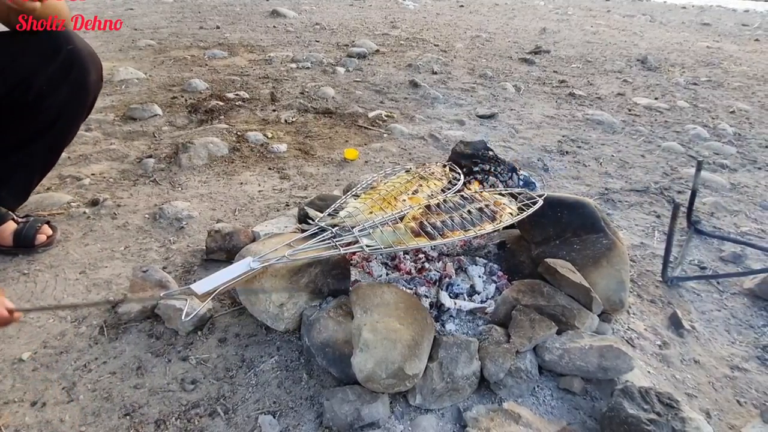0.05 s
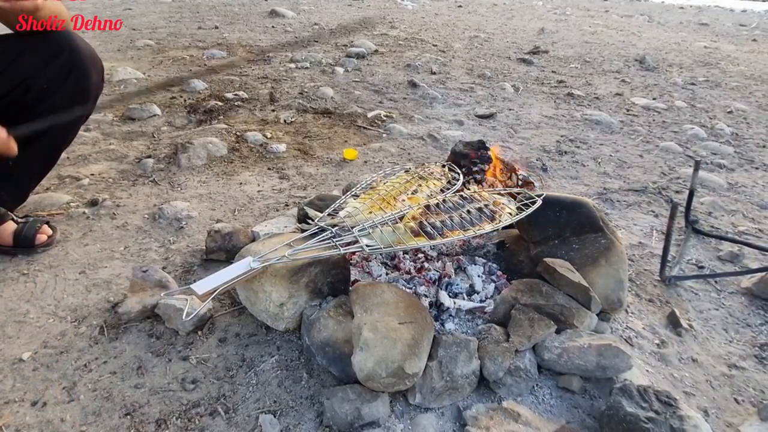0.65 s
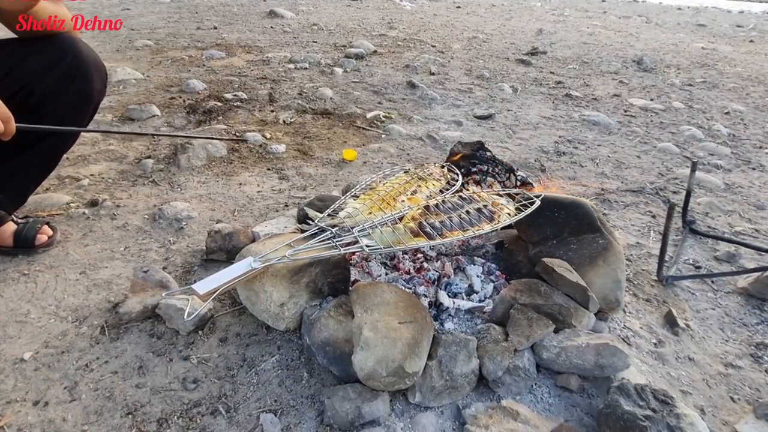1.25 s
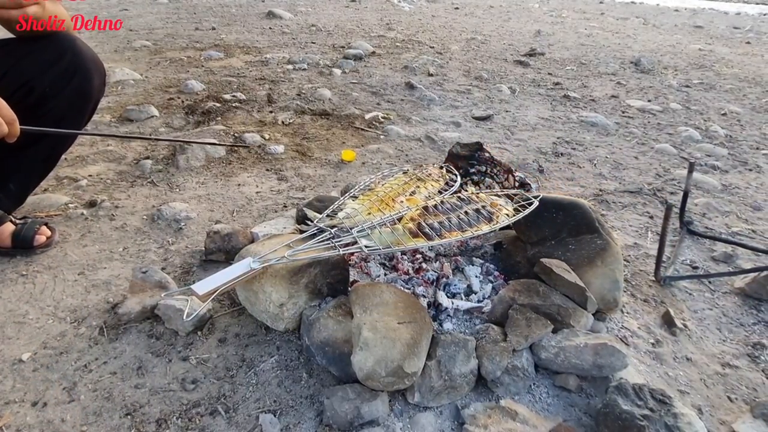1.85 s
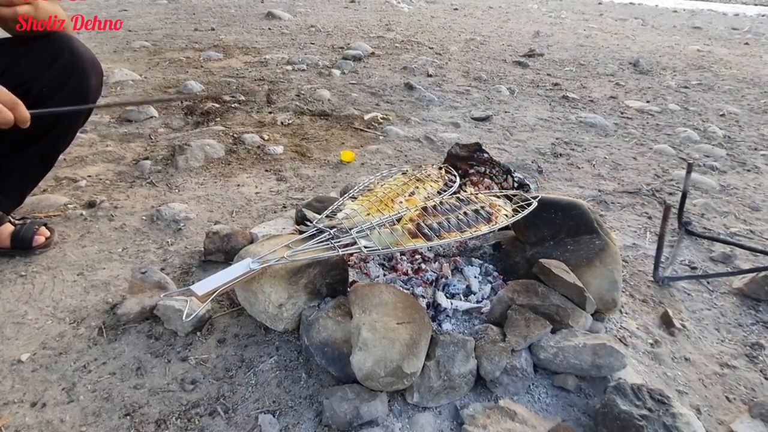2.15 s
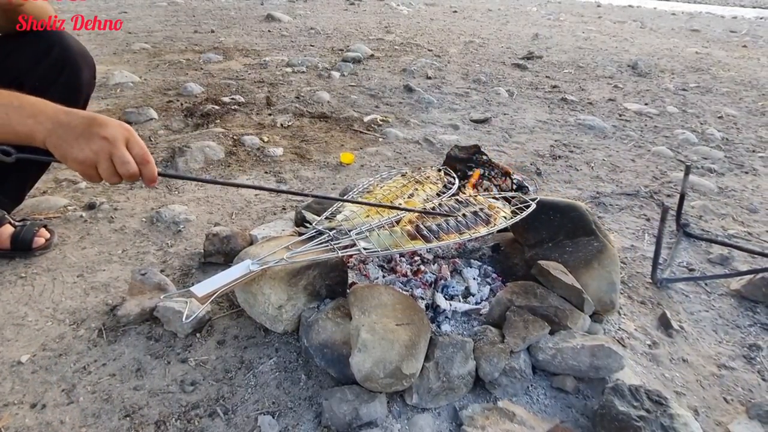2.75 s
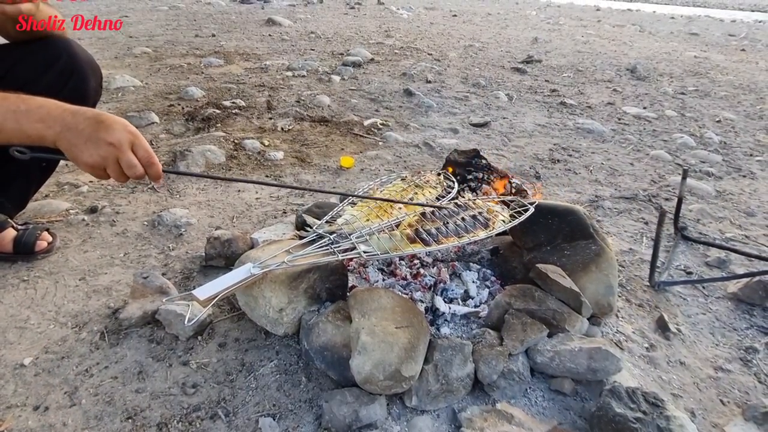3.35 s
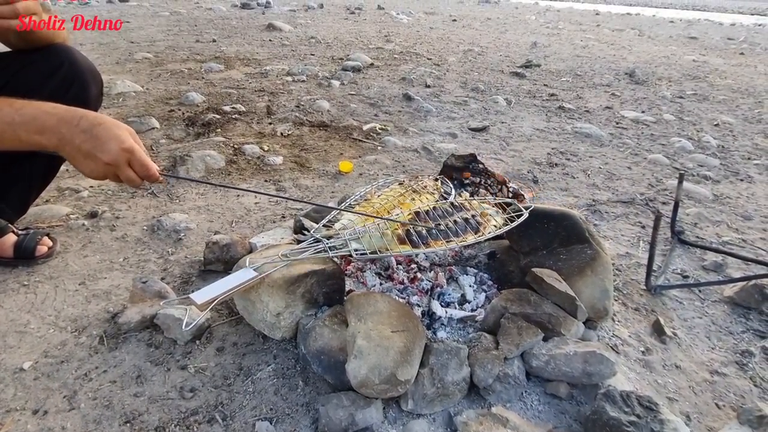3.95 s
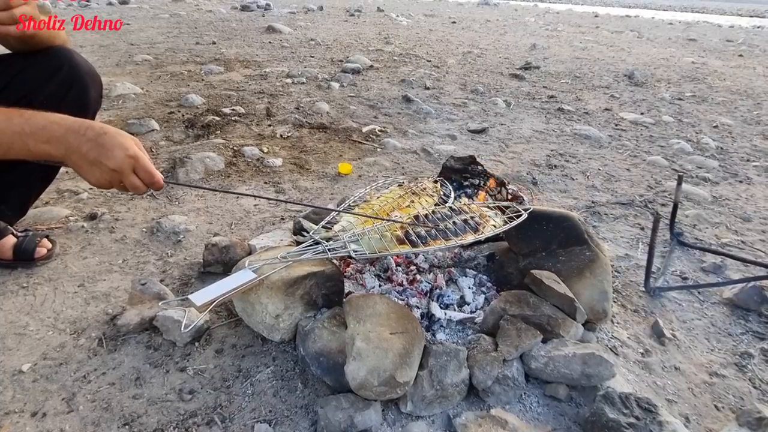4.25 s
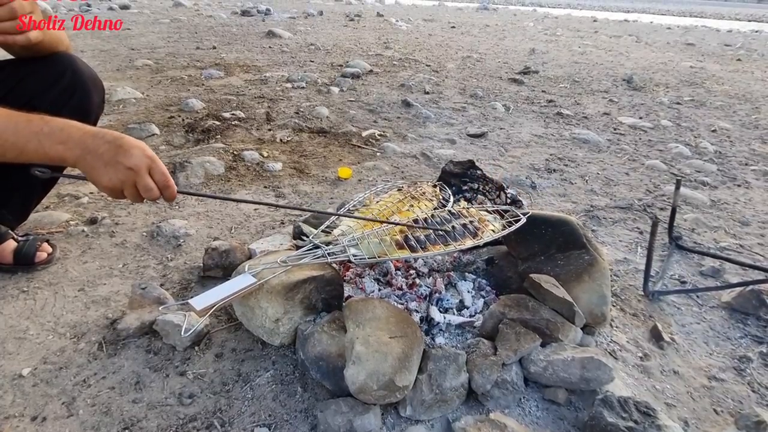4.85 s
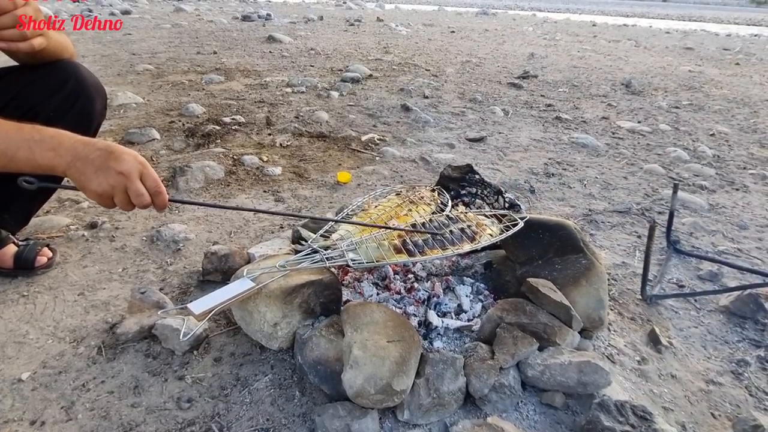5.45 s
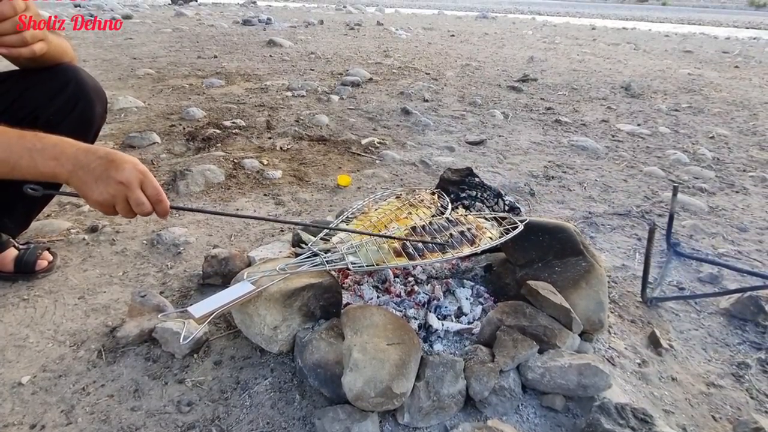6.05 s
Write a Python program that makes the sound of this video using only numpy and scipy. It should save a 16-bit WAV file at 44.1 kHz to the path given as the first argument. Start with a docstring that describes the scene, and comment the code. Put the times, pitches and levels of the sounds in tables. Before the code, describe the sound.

A steel skewer clicks sharply twice on stone, each strike ringing briefly. Close to the microphone, fish sizzles softly over a small outdoor fire, the hiss swelling and fading above a low flutter of flames. Embers tick and pop, more strongly in the second half, and fat spits now and then. A river rushes quietly and steadily farther back. Near the end, wind briefly thumps the microphone.

```python
"""Fish sizzling over a small stone-ringed fire on a river bank, close to a stereo microphone.
Tiny bubbles burst, steam whistles out of the skin and fat spits on the coals. Gas pockets pop the
embers over softly fluttering flames, and at the start a steel skewer clicks twice on the stones.
Farther back the river rushes steadily; near the end a puff of wind buffets the microphone."""
import sys
import numpy as np
from scipy import signal
from scipy.fft import rfft, irfft, next_fast_len
from scipy.io import wavfile
from scipy.ndimage import uniform_filter1d

SR = 44100
rng = np.random.default_rng(int(sys.argv[2]) if len(sys.argv) > 2 else 0)


def persist_wave(psi):
    """Save psi, clipped to +-1, as 16-bit WAV."""
    counts = np.round(np.clip(psi, -1, 1) * 32767).astype(np.int16)
    wavfile.write(sys.argv[1], SR, np.atleast_2d(counts).T)


N = 269134
TIME = np.arange(N) / SR
MIC_DELAY_S = 6.6e-5  # sound from the fire reaches the right side of the microphone first


def gain_of(db):
    """Decibels to amplitude."""
    return 10 ** (np.asarray(db) / 20)


def unit_rms(x):
    """Scales to rms 1."""
    return x / np.sqrt(np.mean(x ** 2) + 1e-20)


def curve_at(points, hz):
    """Reads a table on a log-frequency axis."""
    point_hz, value = np.transpose(points)
    return np.interp(np.log(hz + 1), np.log(point_hz + 1), value)


def hump(hz, centre_hz, octaves):
    """A bell of height 1 on the log-frequency axis."""
    return np.exp(-.5 * (np.log2((hz + 1) / centre_hz) / octaves) ** 2)


def add(mix, start_s, sound):
    """Mixes a stereo sound in at start_s."""
    part = mix[:, max(round(start_s * SR), 0):][:, :sound.shape[1]]
    part += sound[:, :part.shape[1]]


def colour(x, db_at):
    """Minimum-phase filter whose gain is db_at(Hz): attacks stay sharp."""
    size = next_fast_len(x.shape[-1] + 2048)
    hz = abs(np.fft.fftfreq(size, 1 / SR))
    log_gain = np.log(gain_of(np.maximum(db_at(hz), -100)))
    response = np.exp(np.conj(signal.hilbert(log_gain)))[:size // 2 + 1]
    return irfft(rfft(x, size) * response, size)[..., :x.shape[-1]]


def from_fire(x, direct):
    """Two unrelated signals become a microphone pair: the left is the right, delayed, plus scatter."""
    shared, scattered = rfft(x)
    lag = np.exp(-2j * np.pi * np.fft.rfftfreq(x.shape[1], 1 / SR) * MIC_DELAY_S)
    left = irfft(direct * shared * lag + np.sqrt(1 - direct ** 2) * scattered, x.shape[1])
    return np.array([left, x[0]])


def panned(db):
    """Left and right gains for a left-minus-right level."""
    return gain_of([[db / 2], [-db / 2]])


def wander(rate_hz):
    """Random drift of rms 1 that moves up to rate_hz times a second."""
    t = np.arange(0, N + 256, 256) / SR
    drift = sum(np.sin(2 * np.pi * (rate_hz * share * t + turn)) for share, turn in rng.random((20, 2)))
    return np.interp(TIME, t, unit_rms(drift))


def patches(noise, rows, columns):
    """Smooths a grid of noise into patches of rms 1."""
    return unit_rms(uniform_filter1d(uniform_filter1d(noise, rows, axis=0), columns, axis=1))


def swells(rows, attack_s, release_s):
    """The gain of events that each rise, hold and die away; their powers add."""
    power = np.zeros(N)
    for start, length, db in rows:
        rise = np.clip((TIME - start) / attack_s, 0, 1)
        fall = np.exp(-np.maximum(TIME - start - length, 0) / release_s)
        power += (gain_of(db) * rise * fall) ** 2
    return np.sqrt(power)


def fracture(t, t60, tail_db, tail_t60, rise_s, snap=0.0):
    """An optional hard snap, a dense volley of smaller ones, then weaker scatter from the stones."""
    grit = rng.choice([-1, 1], (2, len(t))) * rng.uniform(.2, 1.7, (2, len(t)))
    decay = np.hypot(gain_of(-60 * t / t60), gain_of(tail_db - 60 * t / tail_t60))
    volley = grit * (1 - np.exp(-t / rise_s)) * decay
    volley[0, round(.0008 * SR)] += snap
    return volley


def unit_attack(x):
    """Scales the loudest millisecond to rms 1."""
    return x / np.sqrt(uniform_filter1d((x ** 2).mean(0), 44).max())


# Likeness of left and right for sound from all around: (frequency [Hz], coherence [0-1])
DIFFUSE_COHERENCE = [(40, 0.68), (130, 0.997), (300, 0.84), (640, 0.78), (1400, 0.3), (3000, 0.27),
                     (6000, 0)]

def rush(spectrum, patchy_db):
    """Diffuse turbulent noise with drifting patches of loudness."""
    frames, hz = N // 256 + 6, np.fft.rfftfreq(2048, 1 / SR)
    noise = rng.standard_normal((5, frames, len(hz)))
    coherence = curve_at(DIFFUSE_COHERENCE, hz)
    left = noise[0] + 1j * noise[1]
    right = coherence * left + np.sqrt(1 - coherence ** 2) * (noise[2] + 1j * noise[3])
    gain = gain_of(curve_at(spectrum, hz) + patchy_db * patches(noise[4], 14, 16))
    spectra = (np.array([left, right]) * gain).transpose(0, 2, 1)
    return unit_rms(signal.istft(spectra, nperseg=2048, noverlap=1792)[1][:, :N])


# The river as heard from the bank: (frequency [Hz], relative level [dB])
RIVER_SPECTRUM = [(30, -24), (100, -9), (300, 3), (480, -3), (660, -1), (830, -14), (1000, -3.5),
                  (1200, -16), (1480, 0), (1700, -14), (1920, -4.5), (2400, -15), (4500, -11.5),
                  (15700, -33.5)]

def river():
    """Water rushes behind the fire, a little louder as the air starts to move."""
    # (time [s], level [dB])
    swell = [(0, -52.5), (.5, -57), (1.7, -54.5), (2.4, -52), (3.9, -53.5), (4.2, -54.5), (6.1, -54)]
    return rush(RIVER_SPECTRUM, patchy_db=2.0) * gain_of(np.interp(TIME, *np.transpose(swell)))


# Puffs right on the microphone: (time [s], length [s], left level [dB], right level [dB])
WIND_PUFFS = [(0.048, 0.081, -58, -59), (1.04, 0.0604, -61, -56.5), (5.496, 0.15, -73, -43),
              (5.692, 0.033, -44, -40), (5.759, 0.31, -75, -39), (5.828, 0.056, -32.5, -29)]

def wind(shared=0.5):
    """Eddies thump the microphone, mostly on its right side."""
    out = np.zeros((2, N))
    # (frequency [Hz], relative level [dB])
    eddy = [(15, -37), (45, -7.5), (85, 0), (135, -10.0), (250, -24.5), (600, -49), (2000, -89)]
    for start, length, left_db, right_db in WIND_PUFFS:
        size = int(length * SR)
        push = rng.standard_normal((2, size)) + shared * rng.standard_normal(size)
        push = np.pad(push * signal.windows.tukey(size, .6), ((0, 0), (0, SR // 10)))
        air = colour(push, lambda hz: curve_at(eddy, hz))
        air /= np.sqrt((air ** 2).sum(1, keepdims=True) / size)
        add(out, start - .004, air * gain_of([[left_db], [right_db]]))
    return out


# The low roar of the flames, close by: (frequency [Hz], relative level [dB])
FLAME_SPECTRUM = [(25, -61), (45, -1.5), (75, 2), (140, -4.5), (240, -4.5), (330, -14.5), (420, -8.5),
                  (500, -18), (660, -10), (830, -23.5), (1500, -24.5), (3000, -28), (6000, -43.5)]
# The draught feeds the fire: (time [s], length [s], level [dB])
FLAME_SURGES = [(-.03, .2, -56), (1.02, 0.29, -54), (1.92, 1.96, -50), (4.11, .55, -49), (4.8, .62, -47.5),
                (5.55, .5, -53)]

def flames(burn_db=-58.5, flutter_db=1.6):
    """Gas burns low, surges with the draught and flutters at random."""
    draught = np.hypot(gain_of(burn_db), swells(FLAME_SURGES, attack_s=0.044, release_s=0.099))
    return rush(FLAME_SPECTRUM, patchy_db=1.0) * draught * gain_of(flutter_db * wander(rate_hz=7))


# The coals up close, for ticks, pops and spits alike: (frequency [Hz], relative level [dB])
EMBER_SPECTRUM = [(300, -61), (800, -15), (1100, -1.5), (1400, -9.5), (2000, -0.5), (2550, -5),
                  (3000, -0.5), (4200, 1.5), (6000, 1), (9000, -1), (12000, -3.5), (15500, -3.5)]

def ash_ticks(ticks_per_s=14, tick_db=-57, spread_db=3.0):
    """Settling ash ticks faintly at random."""
    ticks = rng.random(N) < ticks_per_s / SR
    gains = gain_of(tick_db + spread_db * np.minimum(rng.exponential(1, N), 3))
    out, t = np.zeros((2, N)), np.arange(1024) / SR
    for at in np.flatnonzero(ticks):
        add(out, at / SR, gains[at] * fracture(t, t60=0.0027, tail_db=-25, tail_t60=.03, rise_s=.0001))
    return from_fire(colour(out, lambda hz: curve_at(EMBER_SPECTRUM, hz)), direct=0.35)


def stone_echo(x, delay_s, share):
    """Adds the reflection from a neighbouring stone, which combs the spectrum."""
    return x + share * np.pad(x, ((0, 0), (round(delay_s * SR), 0)))[:, :x.shape[1]]


# Embers popping in front of the microphone:
# (time [s], attack level [dB], cavity pitch [Hz], top octave [dB], t60 [s], left minus right [dB])
EMBER_POPS = [(1.107, -44, 8010, -2, 0.02, -2), (1.4638, -37, 5340, 0, 0.0044, -2),
              (1.784, -39, 4400, -1, .006, -2), (2.0372, -42, 8000, 4, 0.0088, -3),
              (2.2185, -40, 3750, -4, .018, 2), (2.294, -36.5, 7500, 9, 0.016, -3),
              (2.83, -34, 7400, -4, 0.034, -4), (2.838, -28.5, 7300, -6, 0.015, 0),
              (3.2029, -22.5, 4630, -1, 0.015, -1.5), (3.5712, -25.5, 4224, 0, 0.0097, -2),
              (3.605, -40, 4060, 5, 0.0165, -1), (4.3782, -44.5, 3320, -11, 0.0083, -6),
              (4.5369, -31, 5300, -2, 0.0066, -15), (4.5397, -26, 3580, -1, 0.0142, 1),
              (4.6345, -39.5, 3640, -14, .006, -2), (4.78, -45, 3540, -8, .007, -2.5),
              (4.8144, -28.5, 4063, 4, 0.0173, -2), (4.8545, -37, 7460, -5.5, 0.0052, -8),
              (5.1262, -35.5, 3530, 1, 0.017, 1), (5.2087, -42.5, 4400, -7, 0.0031, -2),
              (5.4633, -41.5, 5130, -6, 0.02, -4), (5.5742, -42.5, 5330, 5, 0.013, -2),
              (5.623, -40, 7350, 0, 0.0067, -2), (5.7633, -37, 6910, -2, 0.01, -1),
              (5.9463, -38, 7840, -1, 0.0051, -1), (6.06, -34.5, 4210, 3.5, 0.024, -1)]

def ember_pops(cavity_db=6, ping_db=7, wood_db=4, glint_db=6):
    """Gas pockets crack the charcoal: small ones just tick, large ones ring the cavity and the lump."""
    out, t = np.zeros((2, N)), np.arange(4096) / SR
    for start, db, pitch_hz, bright_db, t60, pan_db in EMBER_POPS:
        bulk = np.clip(t60 / .018, .1, 1)  # longer pops count as larger

        def pop_db(hz):
            tone = cavity_db * hump(hz, pitch_hz, 0.6) + bright_db * hump(hz, 14000, 1.0)
            rings = (ping_db * hump(hz, pitch_hz, 0.036) + wood_db * hump(hz, 2000, 0.11)
                     + glint_db * hump(hz, 14300, 0.034))
            return curve_at(EMBER_SPECTRUM, hz) + tone + bulk * rings

        tail_db = -11.0 - 4.5 * (1.5 - bulk)
        crack = fracture(t, t60, tail_db, tail_t60=0.061, rise_s=0.00062 * bulk, snap=0.51)
        crack = stone_echo(crack, delay_s=rng.uniform(.00092, .00106), share=.45 * bulk)
        crack = from_fire(colour(crack, pop_db), direct=0.45)
        add(out, start - .0002, unit_attack(crack) * gain_of(db) * panned(pan_db))
    return out


# The skewer knocks on the ring of stones, near the microphone:
# (time [s], attack level [dB], ring against crack [dB], top treble [dB], crack t60 [s])
SKEWER_CLICKS = [(.2171, -16.5, -3, 0, .05), (.431, -14.3, 0, 3, .036)]
# The rod's modes; the point of contact decides which speak:
# (frequency [Hz], t60 [s], relative level in first click [dB], in second click [dB])
SKEWER_MODES = [(2200, .05, -19, -19), (2363, .055, -16, -24), (4040, .07, -8, -12), (4330, .06, -8, -8),
                (5145, .075, -2, -7), (5680, .055, -8, -4), (6468, .14, -10, -15), (6735, .08, -12, -4),
                (7688, .07, -5, -1), (8210, .08, -16, -14), (10022, .055, -2, -15), (10910, .06, -5, -16),
                (11735, .074, -6, -17), (12095, .064, -4, 2), (12620, .045, -10, 0), (13242, .08, -14, -10),
                (13570, .055, -3, -3), (14500, .08, -11, -15), (15640, .05, -11, -7)]
# The crack of steel on stone: (frequency [Hz], relative level [dB])
STONE_SPECTRUM = [(300, -29), (800, -14.5), (1500, -18.5), (2200, -5.5), (3150, -16.5), (4200, 3),
                  (5000, -2), (6600, 1.5), (7900, 3), (9200, -5), (13000, -1.5), (16000, -3.5)]

def skewer(scatter_turns=0.19):
    """Steel strikes stone: a gritty crack, and the rod rings briefly."""
    out, t = np.zeros((2, N)), np.arange(SR // 4) / SR
    for click, (start, db, ring_db, bright_db, t60) in enumerate(SKEWER_CLICKS):
        crack = fracture(t, t60, tail_db=-12, tail_t60=0.13, rise_s=0.0017, snap=1.2)
        crack = colour(crack, lambda hz: curve_at(STONE_SPECTRUM, hz) + bright_db * hump(hz, 16000, .4))
        crack = from_fire(crack, direct=0.27)
        ring = np.zeros((2, len(t)))
        for hz, mode_t60, *mode_db in SKEWER_MODES:
            left_lag = np.array([[hz * MIC_DELAY_S / 2], [0]])
            # echoes from the stones scatter the phase between left and right
            phase = rng.random() + scatter_turns * rng.standard_normal((2, 1)) - left_lag
            ring += gain_of(mode_db[click] - 60 * t / mode_t60) * np.sin(2 * np.pi * (hz * t + phase))
        ring *= 1 - np.exp(-t / 0.00096)
        strike = unit_attack(crack) + gain_of(ring_db) * unit_attack(ring)
        add(out, start - .0003, gain_of(db) * strike)
    return out * panned(db=-0.3)


# Fat dripping under the fish: (time [s], length [s], level [dB], pitch [Hz], resonance [dB])
FAT_SPITS = [(1.135, 0.23, -47.5, 4240, 9.5), (4.553, 0.038, -45, 4000, 1.5), (4.831, 0.077, -46, 4000, -2),
             (5.143, 0.065, -52.5, 4500, -2), (5.484, .07, -47.5, 4480, 2), (5.801, .06, -49, 3800, -1)]

def fat_spits(jet_db=4, lower_ratio=0.624, fizz_db=4):
    """Fat lands on a coal and boils off in a short grainy hiss with two resonances."""
    out = np.zeros((2, N))
    for start, length, db, pitch_hz, resonance_db in FAT_SPITS:
        def spit_db(hz):
            tone = jet_db * hump(hz, pitch_hz, 1.0) + fizz_db * hump(hz, 21000, 0.25)
            peaks = hump(hz, pitch_hz, .04) + hump(hz, pitch_hz * lower_ratio, 0.082)
            return curve_at(EMBER_SPECTRUM, hz) + tone + resonance_db * (peaks - hump(hz, 11400, 0.52))

        size = int(length * SR)
        noise = rng.standard_normal((2, size))
        grain_db = 2.3 * unit_rms(uniform_filter1d(rng.standard_normal(size), size=60))
        hiss = unit_rms(colour(noise * gain_of(grain_db), spit_db))
        swell = np.sin(np.pi * np.linspace(0, 1, size) ** 0.5)
        add(out, start, from_fire(hiss, direct=0.29) * swell * gain_of(db))
    return out


# Steam leaving the fish skin, faint even up close: (time [s], length [s], level [dB])
STEAM_JETS = [(2.2, .92, -64.5), (3.25, .65, -66.5)]

def steam_whistle(pitch_hz=5290, sag_hz_per_s=140, waver_hz=45.3, width_hz=200, upper_ratio=1.51):
    """A thin jet sings in two fuzzy tones that waver together and sag as the pressure drops."""
    sag_hz = sag_hz_per_s * (TIME - STEAM_JETS[0][0])
    turns = np.cumsum(pitch_hz - sag_hz + waver_hz * wander(rate_hz=13)) / SR
    pole = np.exp(-np.pi * width_hz / SR)
    noise = rng.standard_normal((2, N)) + 1j * rng.standard_normal((2, N))
    fuzz = signal.lfilter([1], [1, -2 * pole, pole * pole], noise)
    lower = unit_rms((fuzz[0] * np.exp(2j * np.pi * turns)).real)
    upper = unit_rms((fuzz[1] * np.exp(2j * np.pi * upper_ratio * turns)).real)
    return (lower + gain_of(0.5) * upper) * swells(STEAM_JETS, attack_s=.09, release_s=.05)


# The hiss swells, first as the skewer scrapes through ash, later as the sizzle flares up:
# (time [s], length [s], level [dB])
HISS_SWELLS = [(-.03, 0.13, -45.5), (1.075, .17, -52.5), (1.3, 0.47, -59), (2.187, 0.82, -50.5),
               (3.053, .55, -54.5), (3.603, 0.33, -51)]

def hiss_strength(simmer_db=-55, drying_db_per_s=0.8, sputter_db=1.17):
    """A simmer that fades as the fish dries, plus swells of hiss; both sputter at random."""
    simmer = gain_of(simmer_db - drying_db_per_s * TIME)
    swell = swells(HISS_SWELLS, attack_s=0.081, release_s=0.11)
    return np.hypot(simmer, swell) * gain_of(sputter_db * wander(rate_hz=30.6))


# The fish up close, a little right of centre: (frequency [Hz], relative level [dB])
SIZZLE_SPECTRUM = [(1000, -33), (2500, -10.5), (4000, -8), (5200, -0.5), (6500, -0.5), (7900, 5.5),
                   (9200, -2), (11000, -4.5), (13000, -5), (15700, -10.5)]
# Sizzle that arrives straight at the microphone: (frequency [Hz], share [0-1])
SIZZLE_DIRECT = [(1000, .4), (5000, .3), (6400, .75), (7200, .6), (7900, .45), (8700, .72), (10800, .7),
                 (12500, .3), (15400, .65)]

def sizzle(bubbles_per_s=3500, spread_db=2.5, steam=0.74):
    """Tiny bubbles burst over a hiss of steam, with slight random unevenness added."""
    sizes = gain_of(spread_db * np.minimum(rng.exponential(1, (2, N)), 5))
    signs = rng.choice([-1, 1], (2, N))
    bubbles = unit_rms(sizes * signs * (rng.random((2, N)) < bubbles_per_s / SR))
    hz, _, spectra = signal.stft(bubbles + steam * rng.standard_normal((2, N)), SR, nperseg=512)
    uneven_db = 1.6 * patches(rng.standard_normal(spectra.shape[1:]), 3, 9)
    spectra *= gain_of(curve_at(SIZZLE_SPECTRUM, hz)[:, None] + uneven_db)
    fry = unit_rms(signal.istft(spectra)[1][:, :N])
    direct = curve_at(SIZZLE_DIRECT, np.fft.rfftfreq(N, 1 / SR))
    return from_fire(fry, direct) * hiss_strength() * panned(db=-2.0)


def scene():
    """The river behind, the fish and fire in front, the wind on the microphone."""
    return (river() + flames() + sizzle() + steam_whistle() + ember_pops() + ash_ticks()
            + fat_spits() + skewer() + wind())


def record(dry):
    """The recorder's band limit cuts the highest treble."""
    lowpass = signal.firwin(401, cutoff=15900, window=("kaiser", 9), fs=SR)
    return signal.oaconvolve(dry, lowpass[None], "same")


dry = scene()
out = record(dry)
persist_wave(out)
```